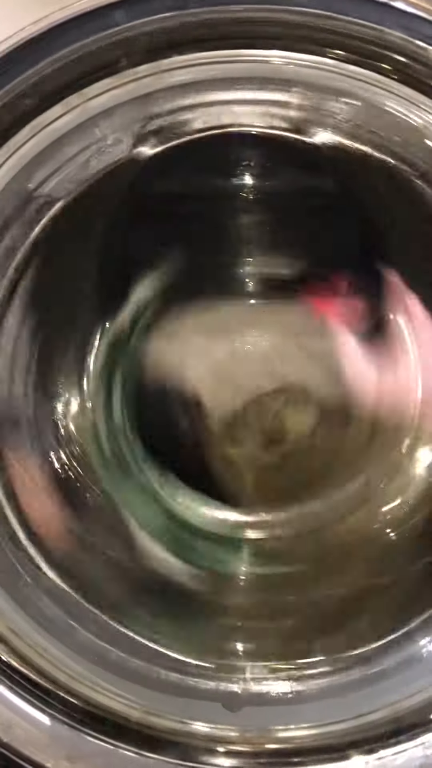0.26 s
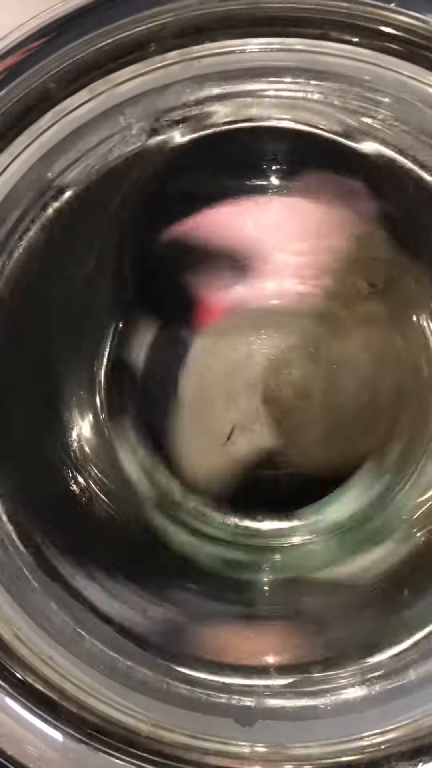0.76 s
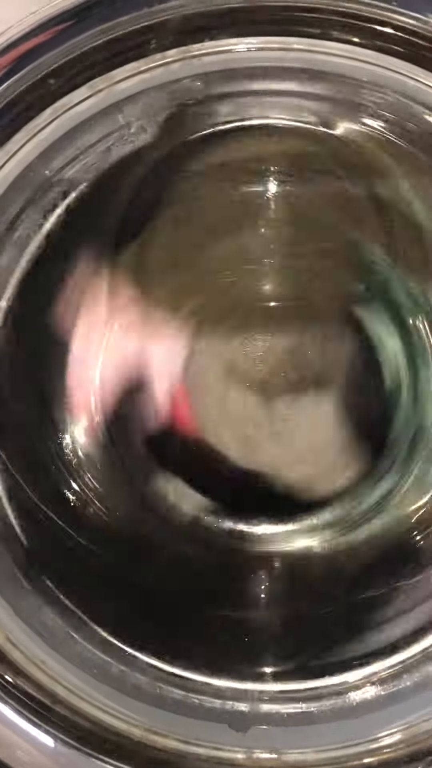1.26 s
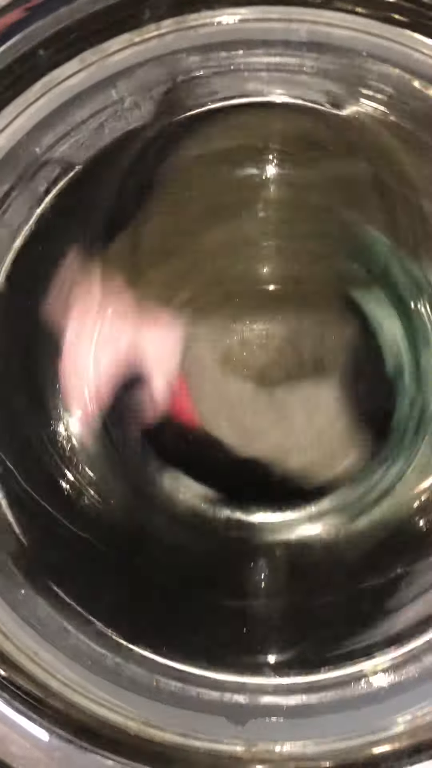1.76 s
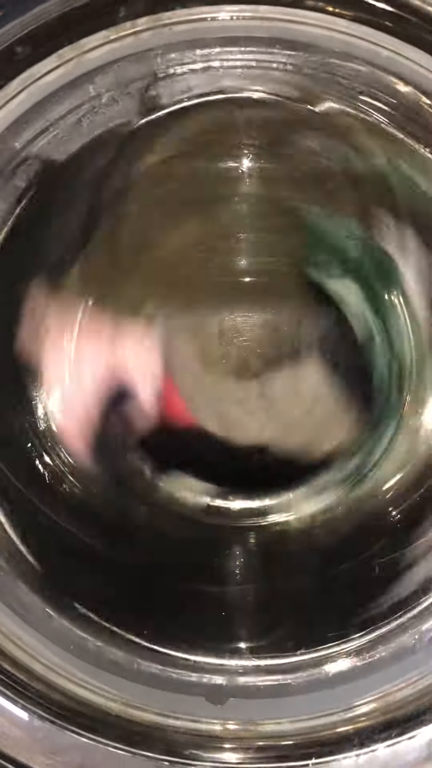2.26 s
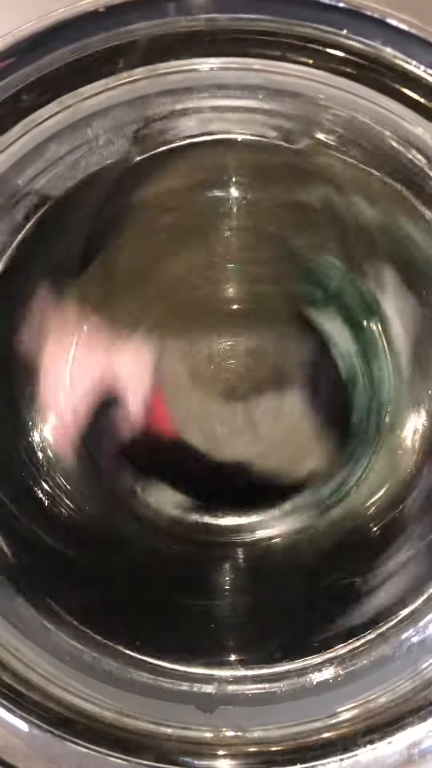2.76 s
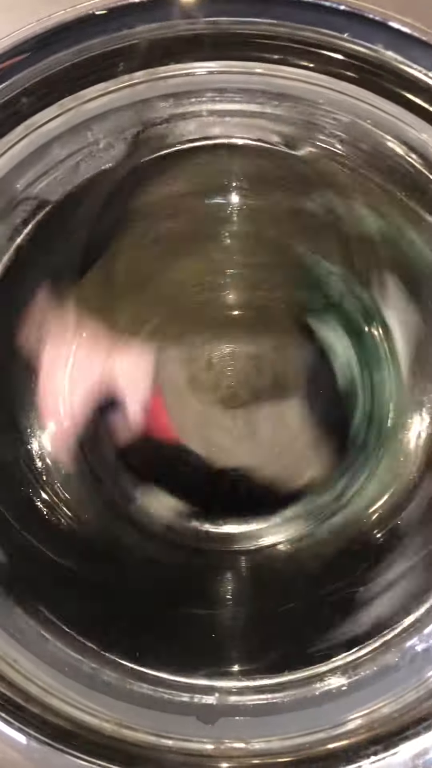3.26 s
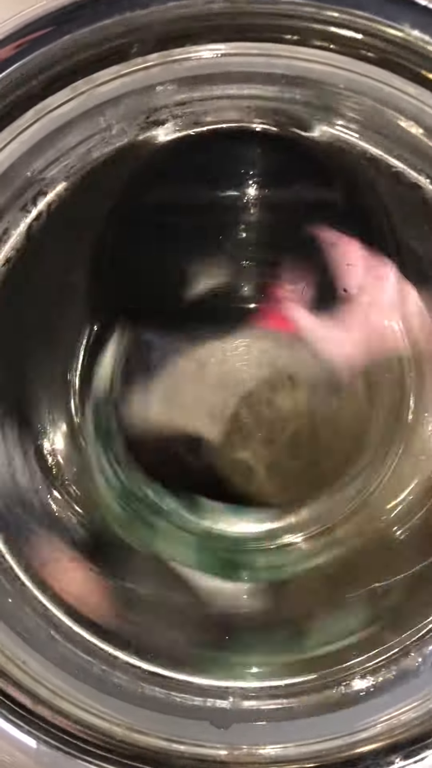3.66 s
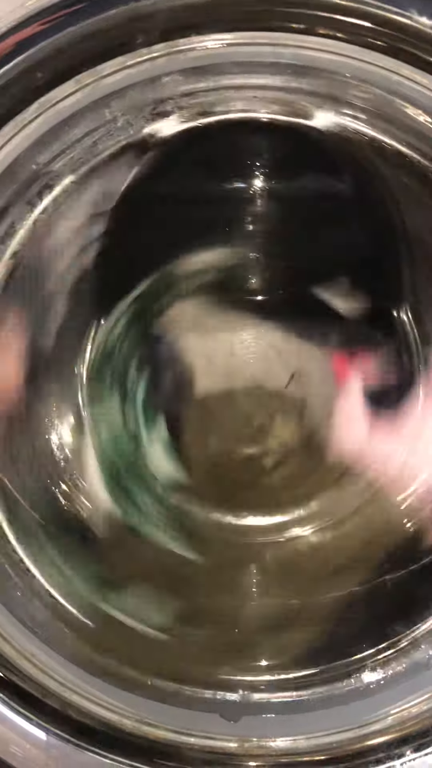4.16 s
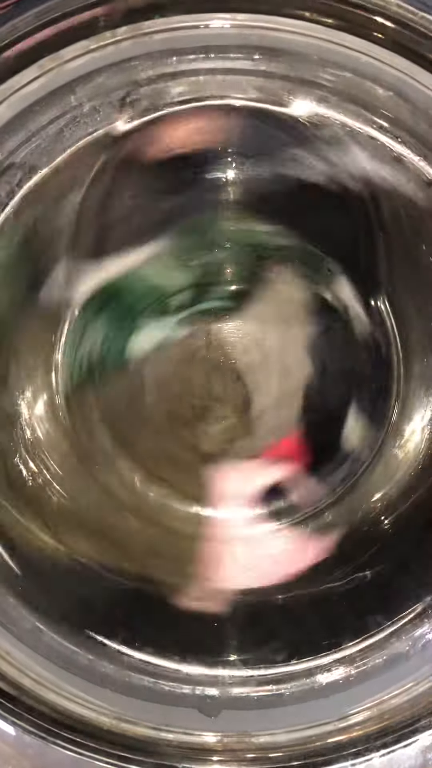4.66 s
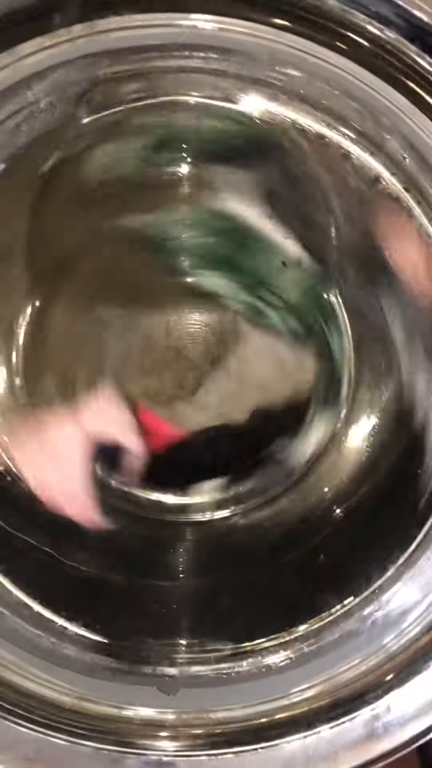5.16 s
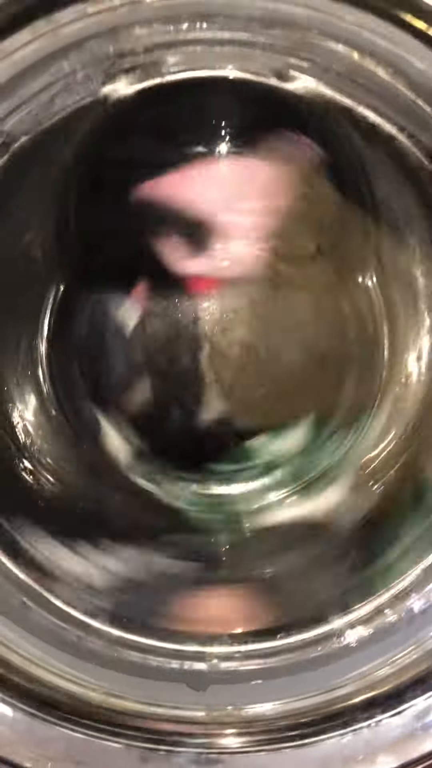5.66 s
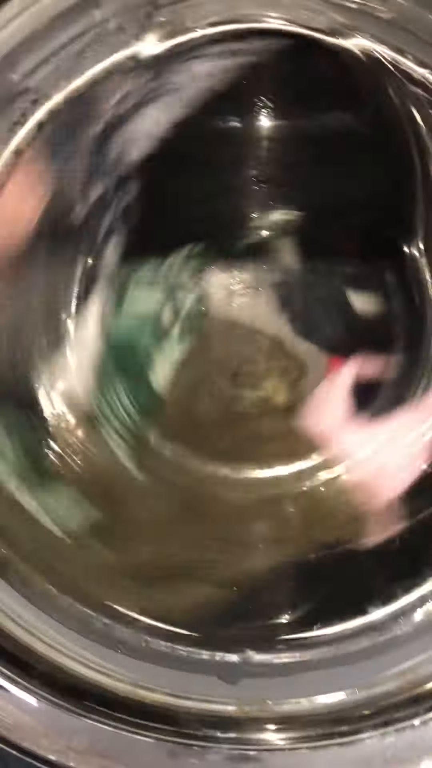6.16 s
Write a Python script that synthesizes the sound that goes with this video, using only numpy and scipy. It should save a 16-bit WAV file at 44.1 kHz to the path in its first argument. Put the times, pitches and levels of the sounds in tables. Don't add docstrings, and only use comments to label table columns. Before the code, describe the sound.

Close to a front-loading washing machine in a small room, an unbalanced load bangs the steel cabinet loudly once per turn, over low pump hum and airy drum hiss. Water spits in short spurts and loose parts tap between blows. The knocks gradually slow, weaken and stop after about four seconds, leaving hum, soft wash, faint floor bumps and late drain spurts. Close, near-mono phone sound.

```python
import sys
import numpy as np
from scipy import signal
from scipy.fft import rfft, irfft
from scipy.io import wavfile
from scipy.ndimage import uniform_filter1d

SR = 44100
rng = np.random.default_rng(int(sys.argv[2]) if len(sys.argv) > 2 else 0)


def voltage_ratio(level):
    return 10 ** (np.asarray(level, float) / 20)


def waveform_to_disk(signal):
    frames = np.transpose(np.atleast_2d(signal))
    scaled = np.clip(frames, -1, 1) * 32767
    samples = np.round(scaled).astype(np.int16)
    wavfile.write(sys.argv[1], SR, samples)


N = 282240

# (time [s], peak level [dB], softness of contact [ms])
KNOCK_EVENTS = [
    (0.023, -9.5, 0.1),
    (0.416, -9, 0.092),
    (0.822, -8.5, 0.088),
    (1.242, -8.5, 0.088),
    (1.677, -8.5, 0.12),
    (2.126, -9, 0.11),
    (2.593, -10, 0.08),
    (3.081, -12.5, 0.13),
    (3.601, -16.5, 0.17),
    (4.186, -21.5, 0.15),
]


def level(x, db):
    return x * voltage_ratio(db) / np.sqrt(np.mean(x ** 2))


def walk(rate_hz, size=N):
    hold = int(SR / rate_hz)
    steps = np.repeat(rng.standard_normal(size // hold + 1), hold)
    return 1.3 * uniform_filter1d(uniform_filter1d(steps, hold), hold)[:size]


def band(x, hz, width_hz):
    return signal.lfilter(*signal.iirpeak(hz, hz / width_hz, fs=SR), x)


def band_noise(size, hz, width_hz):
    return band(band(rng.standard_normal(size), hz, width_hz), hz, width_hz)


def fade(t, t60_s):
    return (t >= 0) * np.exp(-np.log(1000) * np.maximum(t, 0) / t60_s)


def flow(spectrum, flicker_db, count):
    hz = np.maximum(np.fft.rfftfreq(N, 1 / SR), 1)
    f, db = np.transpose(spectrum)
    shape = voltage_ratio(np.interp(np.log(hz), np.log(f), db, left=-90, right=-90))
    place = np.interp(np.log(hz), np.log(f[[0, -1]]), [0, count - 1])
    noise = rfft(rng.standard_normal(N)) * shape
    total = np.zeros(N)
    for k in range(count):
        part = irfft(noise * np.clip(1 - abs(place - k), 0, 1), N)
        total += part * voltage_ratio(flicker_db * walk(9))
    return level(total, 0)


def speed():
    last_turns_per_s = 1.41
    knock_s = np.transpose(KNOCK_EVENTS)[0]
    turns_per_s = np.append(1 / np.diff(knock_s), last_turns_per_s)
    at_s = np.append((knock_s[1:] + knock_s[:-1]) / 2, N / SR)
    return np.interp(np.arange(N) / SR, at_s, turns_per_s / turns_per_s[0])


def shake(t60_s):
    full_blow_db = -9
    t = np.arange(N) / SR
    first_s = KNOCK_EVENTS[0][0]
    turn_s = KNOCK_EVENTS[1][0] - first_s
    earlier = [(first_s - k * turn_s, full_blow_db, 0) for k in range(1, 4)]
    total = sum(voltage_ratio(db - full_blow_db) * fade(t - s, t60_s) for s, db, _ in earlier + KNOCK_EVENTS)
    return uniform_filter1d(total, SR // 50)


def floor_sway():
    # (time [s], level [dB], length [s])
    floor_bumps = [
        (4.05, -70, 0.18),
        (5.27, -51, .2),
        (5.88, -58.5, .1),
    ]
    rest_db, shaken_db, settle_t60_s = -64, -44.5, 0.98
    t = np.arange(N) / SR
    moving = voltage_ratio(rest_db) + voltage_ratio(shaken_db) * shake(settle_t60_s)
    for s, db, long_s in floor_bumps:
        moving = moving + voltage_ratio(db) * np.exp(-((t - s) / long_s) ** 2)
    return moving * level(band_noise(N, 45, 25), 0)


def drum():
    # (frequency [Hz], level [dB per Hz])
    hiss_spectrum = [(3240, -17), (5500, -4.5), (6190, -4), (10600, -2), (11300, -2.5), (15200, -1.5),
                     (15700, 2.5)]
    # (frequency [Hz], level [dB per Hz])
    rumble_spectrum = [(40, -43), (70, -15), (110, -10.5), (170, -2.5), (250, -6.5), (350, -10.5),
                       (450, -14), (560, -9), (770, -14.5), (2000, -17), (2600, -41)]
    # (frequency [Hz], level [dB per Hz])
    wash_spectrum = [(710, -11), (1200, -9), (1680, -2), (2340, 0), (2920, 1.5), (3650, 1), (7500, -4),
                     (9750, -20), (16500, -120)]
    hiss_db, rumble_db, wash_db = -37, -44, -41.5
    hiss_power, rumble_power, wash_power = 1.31, 0.31, 0.78
    slosh_db, slosh_rate_hz = 0.62, 11
    v = speed()
    slosh = voltage_ratio(slosh_db * walk(slosh_rate_hz))
    hiss = voltage_ratio(hiss_db) * v ** hiss_power * slosh * flow(hiss_spectrum, 0.7, count=4)
    rumble = voltage_ratio(rumble_db) * v ** rumble_power * flow(rumble_spectrum, 1.27, count=8)
    wash = voltage_ratio(wash_db) * v ** wash_power * slosh * flow(wash_spectrum, 1.2, count=8)
    return hiss + rumble + wash


def whine():
    hz, start_db, fall_db_per_s = 516.5, -52.5, 0.7
    t = np.arange(N) / SR
    strength = np.sqrt(2) * voltage_ratio(start_db - fall_db_per_s * t + 0.84 * walk(8))
    return strength * np.sin(2 * np.pi * hz * t + 0.17 * walk(6.2))


def pump():
    # (frequency [Hz], level against the 200 Hz line [dB], wobble [dB])
    hum_lines = [(50, -24, 2.0), (100, -14.5, 2.0), (150, -11, 1.2), (200, 0, .4), (86, -16, 2.5),
                 (114, -16, 2.5), (172, -23, 2.5), (287, -21, 1.5), (345, -20, 2.0), (400, -25, 2.0)]
    rest_db, rock_db, rock_t60_s = -38.5, -6.5, 2.0
    t = np.arange(N) / SR
    lines = np.zeros(N)
    for hz, db, wobble_db in hum_lines:
        strength = voltage_ratio(db + wobble_db * np.clip(walk(7), -2, 2))
        phase = 0.12 * wobble_db * walk(4.4) + 7 * rng.random()
        lines += strength * np.sin(2 * np.pi * hz * t + phase)
    return np.sqrt(2) * voltage_ratio(rest_db + rock_db * shake(rock_t60_s)) * lines


def drain():
    # (time [s], rms level [dB], rise [s], t60 [s], hollow [index, rounded])
    spurt_events = [(.18, -41, .03, 0.9, 6), (0.329, -41, 0.025, 1.3, 6), (.62, -34.5, 0.031, 1, 6),
                    (.815, -31.5, 0.0086, 0.39, 1.5), (1.67, -30.5, 0.01, 0.42, 2.5),
                    (1.66, -34, 0.016, .5, -0.5), (2.088, -33, .01, 1.7, 1), (2.13, -40, .05, 0.7, 6),
                    (3.262, -25.5, 0.013, 0.48, 0), (3.82, -45.5, 0.018, 0.43, 6),
                    (4.066, -27, 0.013, 0.44, 2), (1.06, -36, .04, .8, 6), (1.42, -36, .04, .6, 1),
                    (2.8, -41, .05, 1, 4), (4.24, -43, .04, 1.1, 4.5), (4.9, -43, .03, .5, 6),
                    (5.1, -48, .02, 0.37, 3), (4.58, -44.5, .03, .5, 4), (4.73, -43, .02, 0.35, 1),
                    (5.58, -45.5, 0.037, 0.77, 3), (5.84, -39, 0.027, 0.56, 1), (6.33, -47, .02, .4, 1),
                    (6.050, -43, 0.0055, 0.41, 3), (6.110, -38, .002, 0.26, 4),
                    (6.128, -34, 0.019, 0.35, 5)]
    # (frequency [Hz], width [Hz], level [dB])
    hollow_modes = [
        [(3150, 850, 2.5), (2200, 1300, -3), (4200, 2400, -2.5), (7300, 1500, 2.5), (5700, 2500, -1),
         (10500, 4400, 2), (14000, 4000, -6)],
        [(5340, 3000, -3.5), (10300, 6700, 2.5), (14700, 3800, -4)],
        [(930, 250, 0), (690, 250, -6), (1530, 1500, -5.5), (2290, 150, -2), (2570, 240, -10), (4900, 350, -9),
         (5590, 260, -6.5), (3460, 3000, -5), (8000, 5500, -3)],
        [(6660, 1500, 0)],
        [(8100, 900, 0), (5000, 3300, 1), (2000, 2700, -1)],
        [(740, 700, -1), (295, 160, 1), (4570, 2800, -4)],
        [(3480, 900, 3), (6860, 4500, 5.5)],
    ]
    t, out = np.arange(SR) / SR, np.zeros(N + SR)
    for s, db, rise_s, t60_s, which in spurt_events:
        spit = 0
        for hz, width_hz, gain_db in hollow_modes[round(which)]:
            ring = level(band_noise(SR, hz, width_hz), gain_db)
            spit = spit + ring * voltage_ratio(0.9 * walk(110, size=SR))
        out[int(s * SR):][:SR] += level(spit, db) * np.minimum(t / rise_s, 1) * fade(t, t60_s)
    return out[:N]


def taps():
    # (time [s], peak level [dB], frequency [Hz])
    tap_events = [(0.249, -41, 371), (0.659, -31, 387), (1.082, -35, 394), (1.359, -36, 376),
                  (1.511, -34, 310), (1.758, -25, 390), (2.699, -33, 365), (3.414, -46, 301),
                  (4.673, -40, 358), (5.29, -43, 360), (5.737, -45, 401)]
    t = np.arange(N) / SR
    return sum(voltage_ratio(db) * fade(t - s, 0.076) * np.sin(2 * np.pi * hz * (t - s)) for s, db, hz in tap_events)


def cabinet():
    # (frequency [Hz], level [dB], t60 [s], first motion [1 toward, -1 away from phone])
    panel_modes = [(74, -19.5, 0.193, -1), (92, -16.2, 0.279, 1), (113, -25.7, 0.395, 1),
                   (133, -16.7, 0.251, -1), (153, -18.0, 0.111, -1), (184, -17.3, 0.175, 1),
                   (234, -15.5, 0.12, 1), (291, -44.1, 0.375, -1), (344, -14.0, 0.106, -1),
                   (357, -46.4, 0.75, 1), (402, -30.4, 0.249, -1), (442, -24.4, 0.146, 1),
                   (564, -44.1, 0.25, -1), (644, -29.4, 0.26, -1), (658, -19.3, 0.081, 1),
                   (696, -22.5, 0.08, -1), (739, -20.3, 0.114, 1), (811, -23.5, 0.198, -1),
                   (855, -14.0, 0.062, -1), (906, -20.0, 0.029, -1), (957, -42.8, 0.305, 1),
                   (1019, -12.9, 0.028, 1), (1132, -31.0, 0.207, 1), (1229, -25.4, 0.164, 1),
                   (1267, -31.3, 0.242, 1), (1613, -37.0, 0.158, 1), (1763, -32.7, 0.126, -1),
                   (2450, -20.4, 0.043, -1), (2629, -21.3, 0.016, 1), (2912, -34.6, 0.05, -1),
                   (479, -35.5, 0.13, -1), (524.5, -32, 0.22, 1), (585, -30.5, .2, -1), (622, -29, 0.24, 1),
                  (1430, -38.5, .15, -1), (1560, -32, .17, 1)]
    # (frequency [Hz], level [dB], t60 [s])
    rattle_bands = [(86, -38.5, 1.25), (127, -34, 1.13), (317, -33, 0.6), (550, -26, 0.27),
                    (674, -29.5, 0.49), (1025, -26, 0.43), (1640, -37, 0.33), (2030, -29, 0.056),
                    (2970, -34.5, 0.44), (3620, -25.5, 0.087), (5200, -20, 0.062), (8000, -21, .05),
                    (13000, -36, .06)]
    t = np.arange(SR // 2) / SR
    ring = 0
    for hz, db, t60_s, way in panel_modes:
        late = t - 0.0214 / np.sqrt(hz)
        ring = ring + np.sign(way) * voltage_ratio(db) * fade(late, t60_s) * np.sin(2 * np.pi * hz * late)
    for hz, db, t60_s in rattle_bands:
        noise = level(band_noise(len(t), hz, 0.73 * hz), db)
        ring = ring + noise * fade(t, t60_s) * np.minimum(t * hz / 12.4, 1)
    return ring


def floor_thud():
    # (frequency [Hz], level [dB], t60 [s])
    board_modes = [(73.1, -23, 0.4), (103, -20.5, .3)]
    rise_s = 0.058
    t = np.arange(SR // 2) / SR
    boom = sum(voltage_ratio(db) * fade(t, t60_s) * np.sin(2 * np.pi * hz * t) for hz, db, t60_s in board_modes)
    return boom * np.minimum(t / rise_s, 1)


def knocks():
    rebound_s, lead_s = 0.07, 0.00076
    ring, thud, out = cabinet(), floor_thud(), np.zeros(N + SR)
    for s, db, soft_ms in KNOCK_EVENTS:
        jitter, spread = rng.standard_normal(2)
        keep = np.exp(-1000 / (SR * max(soft_ms, 0.01)))
        blow = signal.lfilter([1 - keep], [1, -keep], ring)
        out[int((s - lead_s) * SR):][:len(ring)] += voltage_ratio(db + 10.0) * blow
        rebound = int((s + rebound_s + 0.002 * jitter) * SR)
        out[rebound:][:len(ring)] += voltage_ratio(db + 8.0 + 2.5 * spread) * thud
    return out[:N]


def scene():
    mono = floor_sway() + drum() + whine() + pump() + drain() + taps() + knocks()
    return np.tile(mono, (2, 1))


def patches(x, count, size):
    side = np.zeros(N)
    window = np.hanning(size)
    for when, where in rng.random((count, 2)):
        i = 800 + 1024 * int(when * (N // 1024 - 3))
        hz = 4700 * 3.2 ** where
        spectrum = rfft(x[i:i + size] * window)
        inside = abs(np.fft.rfftfreq(size, 1 / SR) - hz) < 0.04 * hz + 400
        scrambled = abs(spectrum) * inside * np.exp(7j * rng.random(len(inside)))
        side[i:i + size] += irfft(scrambled, size) * window
    return side * voltage_ratio(1.5)


def band_limit(x):
    return signal.sosfilt(signal.butter(12, 17090, fs=SR, output="sos"), x)


def record(dry):
    bass_cut = signal.butter(2, 30, "high", fs=SR, output="sos")
    top_cut = signal.ellip(10, 0.2, 70, 15730, fs=SR, output="sos")
    trimmed = signal.sosfilt(bass_cut, dry)
    side = patches(trimmed[0], count=34, size=2048)
    mix = signal.sosfilt(top_cut, trimmed + [side, -side])
    return band_limit(mix)


dry = scene()
out = record(dry)
waveform_to_disk(out)
```